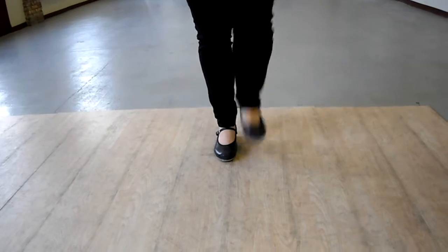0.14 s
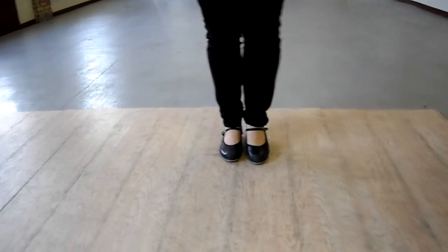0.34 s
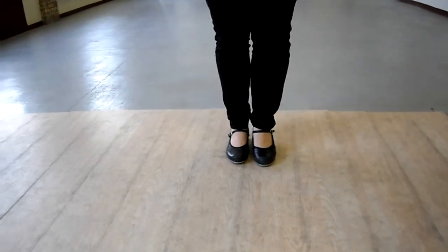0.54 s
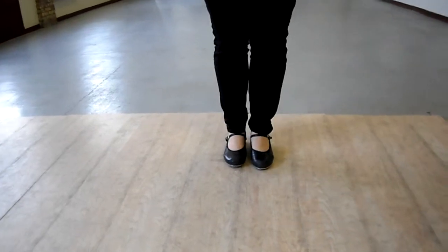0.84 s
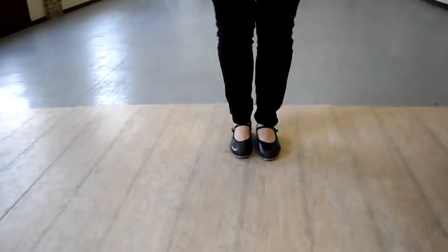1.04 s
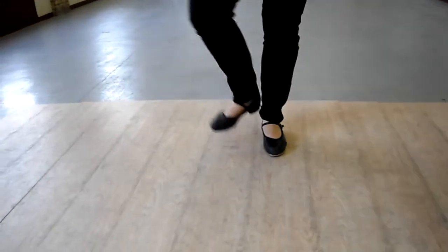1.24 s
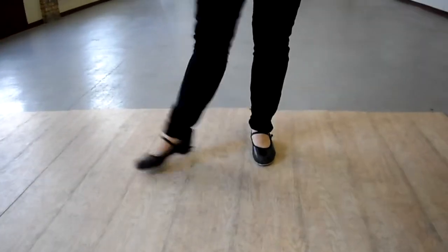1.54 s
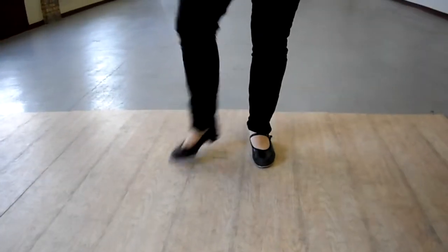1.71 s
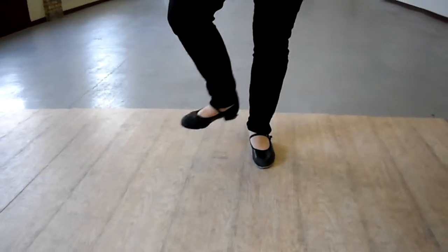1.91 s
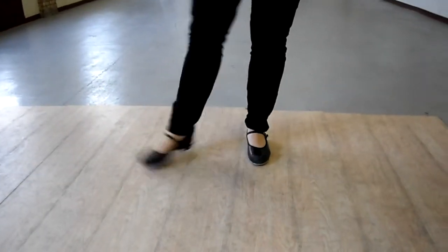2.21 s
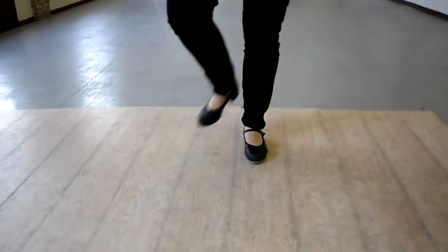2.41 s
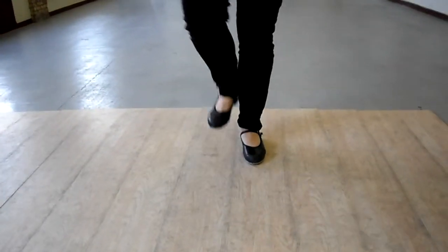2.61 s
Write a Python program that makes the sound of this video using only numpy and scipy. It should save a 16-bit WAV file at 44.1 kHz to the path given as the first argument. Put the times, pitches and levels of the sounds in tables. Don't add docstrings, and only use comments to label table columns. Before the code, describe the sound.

Metal-plated tap shoes click sharply on a wooden board in a large, bare, reverberant room

```python
import sys
import numpy as np
from scipy import signal
from scipy.fft import rfft, irfft, next_fast_len
from scipy.io import wavfile

SR = 44100
rng = np.random.default_rng(int(sys.argv[2]) if len(sys.argv) > 2 else 0)


def invert_db(level):
    return 10 ** (np.asarray(level, dtype=float) / 20)


def inscribe(sig):
    pcm = np.round(np.clip(np.atleast_2d(sig).T, -1, 1) * 32767)
    wavfile.write(sys.argv[1], SR, pcm.astype(np.int16))


N = 121275

LEAD_S = .00026
HALL_TOP_HZ = 14100


def shoes():
    # t/s, peak level/dB, hall level/dB, board ring level/dB
    strikes = [
        (.2070, -6, -32, -29.5),
        (1.4833, -7, -35.5, -26.5),
        (1.6418, -10, -41.5, -40),
        (2.0427, -6.5, -34.5, -24),
        (2.239, -11, -38, -24.5),
    ]
    # t/s, peak level/dB, hall level/dB, left minus right in the shadowed band/dB
    ticks = [
        (.7680, -41.5, -76, -23),
        (1.441, -45.5, -94, -12.5),
    ]
    # f/Hz, level per Hz/dB
    stamp = [(60, -63), (200, -26.5), (420, -18), (1000, -2), (1900, -6), (3500, -17), (8000, -23),
             (14000, -41.5)]
    brush_out = [(60, -72), (200, -34.5), (480, -20), (1100, -7.5), (2500, -13), (5000, -16), (9000, -32),
                 (14000, -42.5)]
    brush_back = [(60, -45.5), (200, -19), (500, -35), (1100, 6.5), (2500, -4.5), (5000, -10), (9000, -15),
                  (14000, -30.5)]
    flap = [(60, -51), (200, -22), (500, -16), (1100, 1.5), (2200, 1), (4200, -5), (8500, -20.5),
            (14000, -30)]
    step = [(60, -40), (200, -19.5), (500, -19.5), (1100, -5), (2300, -6), (4500, -12), (9000, -24.5),
            (14000, -38)]
    tick = [(60, -63), (1500, -43), (2300, 3.5), (3500, 8), (5500, -3), (8000, -21), (12000, -25),
            (15000, -46.5)]
    colours = [stamp, brush_out, brush_back, flap, step]
    # f/Hz, width/Hz, level/dB
    hall_rings = [
        [(1775, 120, 3), (3680, 370, 3), (4670, 570, -3), (5570, 1000, 5), (6980, 480, -5.5)],
        [(2820, 260, -4), (3600, 510, 3.5), (4500, 1400, -3.5), (6050, 700, 1.5), (10700, 1500, 4)],
        [(3550, 640, 6), (4100, 290, -9), (6720, 660, 8), (11100, 330, -20)],
        [(485, 150, 14), (2790, 300, -9.5), (3950, 880, 3), (6740, 550, 6), (11500, 1800, 0.5)],
        [(2390, 370, 3.5), (2880, 310, -2.5), (3790, 600, 5.5), (5540, 470, 3.5)],
    ]
    # f/Hz, width/Hz, level/dB
    facing_rings = [
        [(1380, 850, 1.5), (2010, 690, -4.5), (3030, 880, 9), (3700, 270, -4.5), (5900, 1500, 9.5),
         (8750, 3200, -7), (13500, 830, 7)],
        [(707, 130, 8), (1190, 400, 9), (1770, 1300, -1.5), (2540, 220, 8), (3180, 280, 8.5), (4860, 580, -9.5),
         (6450, 1900, 8), (10500, 2100, 4.5), (14500, 3000, -11)],
        [(1510, 130, -3), (3000, 2800, 7), (5460, 440, -10), (6600, 2400, 13), (9900, 1100, 1),
         (14450, 1300, 14)],
        [(540, 330, 13), (828, 180, 4), (1260, 320, 10), (3270, 2700, 6), (6780, 2100, 16), (8360, 840, 9.5),
         (11300, 2200, 9.5), (14500, 710, 2)],
        [(600, 430, -12), (1724, 610, 2), (2850, 220, 0), (4060, 550, 7), (4900, 890, -2.5), (9800, 450, 5),
         (15500, 1500, -12)],
    ]
    # t after the blow/ms, size over the blow (minus = slaps back on the sole)
    chatters = [
        [(.72, 0.35), (2, 0.028), (2.7, -0.059), (3.75, 0.36), (4.3, -0.12)],
        [(.8, 0.12), (1.6, 0.19), (2.45, 0.3), (4.2, 0.023), (6.8, 0.03)],
        [(.65, -0.52), (1.3, -0.17), (1.9, 0.016), (2.8, .15)],
        [(.95, 0.13), (1.65, 0.24), (2.35, 0.16), (3.15, .2)],
        [(.7, -1.13), (1.7, -0.076), (2.2, 0.48), (4, -0.072)],
    ]
    thump_levels = [-57.5, -62, -63, -71, -56.5]
    # f/Hz, level/dB
    near_pan = [(900, -1), (1700, -3), (2400, -8), (3800, -4), (4800, -5), (7000, -1), (10000, -5),
                (14000, -4)]
    # f/Hz, level per Hz/dB
    earlier = [(60, -25.5), (150, -45), (640, -2), (1100, -1), (2300, -8.5), (4000, -9.5), (8000, -32.5),
               (14000, -65)]
    # f/Hz, width/Hz, level/dB
    earlier_rings = [(1600, 220, 3.5), (2230, 520, 8.3), (3860, 500, 1.3), (6600, 700, 3.1)]

    near = np.zeros((2, N))
    far = hall(earlier, earlier_rings, -46.5, fills=False)
    ring, thump = board_ring(), board_thump()
    blows = zip(strikes, thump_levels, chatters, colours, hall_rings, facing_rings)
    for (s, db, hall_db, ring_db), thump_db, chatter, colour, rings, facing in blows:
        strike(near, far, (s, db, hall_db), chatter, colour, rings, facing)
        add(near, invert_db(ring_db) * ring, s - LEAD_S)
        add(far, invert_db(thump_db) * thump, s)
    for s, db, hall_db, pan_db in ticks:
        strike(near, far, (s, db, hall_db), [(.3, .15)], tick, [], [], pan_db)

    near = filtered(near, lambda hz: ports(hz, along(near_pan, hz), lag_ms=.045))
    far = filtered(far, lambda hz: ports(hz, 0, lag_ms=.025))
    return near + far


def strike(near, far, row, chatter, colour, rings, facing, pan_db=0):
    # delay/ms, level over the hall/dB, left minus right/dB
    echoes = [(11.76, 7.5, 11), (13.47, 20, -2), (19.75, 9, -5.5), (22.88, -10, 11), (26.3, 7, -6.5),
              (35.9, 2, -4), (49.6, -1, 7), (57.5, 11, -2), (59.3, 0.5, -15), (72.2, 16.5, 0.5)]
    shadow_hz, shadow_width_hz = 2970, 1400
    air_db_per_ms = 0.87
    first_walls_ms, first_walls_top_hz = 15, 15600
    scatter_db = 3.5

    s, db, hall_db = row

    def shade(hz):
        dip = np.exp(-((hz - shadow_hz) / shadow_width_hz) ** 2)
        return ports(hz, pan_db * dip, 0)

    direct = filtered(contact(click(colour, facing), chatter), shade)
    add(near, invert_db(db) * direct, s - LEAD_S)
    add(far, hall(colour, rings, hall_db), s - LEAD_S)

    pulse = click(colour, rings)
    for ms, echo_db, echo_pan_db in echoes:
        gains = invert_db(hall_db + echo_db + np.array([[.5], [-.5]]) * echo_pan_db)
        top_hz = first_walls_top_hz if ms < first_walls_ms else HALL_TOP_HZ

        def air(hz):
            absorption = invert_db(-air_db_per_ms * ms * (hz / 10000) ** 2)
            return absorption / (1 + (hz / top_hz) ** 80)

        echo = filtered(contact(pulse, chatter, scatter_db), air)
        add(far, gains * echo, s + ms / 1000 - LEAD_S)


def contact(pulse, chatter, spread_db=0):
    rattle_db, rattle_rise_s, rattle_t60_s, rattle_hz = -15, .001, 0.012, 2600
    alike = .85
    chatter_hz = 5030

    t = np.arange(1024) / SR
    shared = rng.standard_normal(len(t))
    own = rng.standard_normal((2, len(t)))
    own = filtered(own, lambda hz: hz / (hz + rattle_hz / 2))
    noise = alike * shared + np.sqrt(1 - alike ** 2) * own
    swell = (1 - np.exp(-t / rattle_rise_s)) * invert_db(rattle_db + spread_db - 60 * t / rattle_t60_s)
    blows = filtered(swell * noise, lambda hz: 2j * hz * rattle_hz / (rattle_hz + 1j * hz) ** 2)
    for ms, share in chatter:
        blows[:, round(ms * SR / 1000)] += share
    blows = filtered(blows, lambda hz: 1 / (1 + 1j * hz / chatter_hz))
    blows[:, 0] = 1
    return signal.fftconvolve(blows, pulse[None], axes=1)


def click(colour, rings, size=2048):
    # f/Hz, level/dB
    click_colour = [(100, 0), (500, -1), (1300, -3), (3000, 0), (6000, 5), (10000, 12), (14000, 10),
                    (16500, -4)]
    hz = np.fft.rfftfreq(size, 1 / SR)
    magnitude = invert_db(shaped(colour, rings, hz) + along(click_colour, hz))
    cepstrum = irfft(np.log(magnitude + 1e-6))
    cepstrum = np.r_[cepstrum[0], 2 * cepstrum[1:size // 2], np.zeros(size // 2)]
    pulse = irfft(np.exp(rfft(cepstrum)))
    return pulse / abs(pulse).max()


def shaped(colour, rings, hz):
    db = along(colour, hz)
    for centre_hz, width_hz, ring_db in rings:
        db = db + ring_db * np.exp(-((hz - centre_hz) / width_hz) ** 2 * 2)
    return db


def board_ring():
    # f/Hz, level/dB, t60/s
    modes = [(571, -7.5, 0.036), (1150, -6, 0.04), (1507, -5.5, 0.042)]
    bass_limit_hz = 370
    t = np.arange(SR // 5) / SR
    ring = sum(invert_db(db - 60 * t / t60) * np.sin(2 * np.pi * hz * t) for hz, db, t60 in modes)
    return filtered(ring, lambda hz: (1j * hz / (bass_limit_hz + 1j * hz)) ** 3)[None]


def board_thump():
    thump_hz, thump_t60_s = 144, 0.081
    t = np.arange(SR // 5) / SR
    return np.tile(invert_db(-60 * t / thump_t60_s) * np.sin(2 * np.pi * thump_hz * t), (2, 1))


def hall(colour, rings, db, fills=True):
    # f/Hz, t60/s
    decay = [(80, 0.8), (260, 1.8), (700, 1.89), (1800, 2.227), (4800, 1.627), (8000, 1.1), (12800, 0.62)]
    start_ms, fill_ms = 11, 4.4
    hz, t, z = signal.stft(rng.standard_normal((2, N)), SR, nperseg=256)
    z = z * invert_db(-60 * t / along(decay, hz)[:, None])
    pair = signal.istft(z, SR, nperseg=256)[1][:, :N]
    tail = wide(filtered(pair, lambda f: invert_db(shaped(colour, rings, f))))
    tail = tail / tail[:, :SR // 10].std()
    ms = np.arange(N) / SR * 1000
    fill = 1 - np.exp(-np.clip(ms - start_ms, 0, None) / fill_ms) if fills else 1
    return filtered(invert_db(db) * fill * tail, lambda f: 1 / (1 + (f / HALL_TOP_HZ) ** 80))


def wide(pair):
    # f/Hz, side over mid/dB
    side_width = [(60, -15), (150, -15), (380, -22), (950, -13.5), (2380, -7), (5980, 0.5), (15000, 7.5)]
    # f/Hz, left minus right/dB
    field_pan = [(60, -4), (240, 1), (950, -0.5), (3770, -1.5), (15000, 4)]
    mid, side = filtered(pair, lambda hz: invert_db([0 * hz, along(side_width, hz)]))
    left_right = np.array([mid + side, mid - side])
    return filtered(left_right, lambda hz: invert_db(np.outer([.5, -.5], along(field_pan, hz))))


def ports(hz, pan_db, lag_ms):
    turn = 2 * np.pi * np.minimum(hz, 6800) * lag_ms / 1000
    return np.array([invert_db(k * pan_db) * np.exp(-1j * k * turn) for k in (.5, -.5)])


def room_tone():
    # f/Hz, level/dB
    air_colour = [(20, 1.5), (90, -8), (400, -14), (1140, -0.5), (1700, -8), (4400, -32.5), (12300, -37.5),
                  (12700, -54)]
    # f/Hz, rms level/dB
    hum = [(30, -77.5), (90, -83)]
    air_db, hum_side_db = -66, -18
    air = wide(filtered(rng.standard_normal((2, N)), lambda hz: invert_db(along(air_colour, hz))))
    t = np.arange(N) / SR
    drift = np.cumsum(rng.standard_normal((len(hum), 2, N)), axis=2) * .001
    mid, side = sum(invert_db(db) * np.sqrt(2) * np.sin(2 * np.pi * hz * t + phase)
                    for (hz, db), phase in zip(hum, drift))
    return invert_db(air_db) * air / air.std() + mid + invert_db(hum_side_db) * np.outer([1, -1], side)


def along(points, hz):
    f, v = np.transpose(points)
    return np.interp(np.log(hz + 1), np.log(f + 1), v)


def filtered(x, response):
    m = next_fast_len(x.shape[-1] + 8192)
    spectrum = rfft(x, m) * response(np.fft.rfftfreq(m, 1 / SR))
    return irfft(spectrum, m)[..., :x.shape[-1]]


def add(x, part, s):
    room = x[:, round(s * SR):][:, :part.shape[1]]
    room += part[:, :room.shape[1]]


def scene():
    return shoes() + room_tone()


def top_cut(x):
    return signal.sosfilt(signal.butter(12, 16650, fs=SR, output="sos"), x)


def record(dry):
    sweep_ms, sweep_from_hz, top_hz = .5, 10000, 16600

    def band_limit(hz):
        early = np.exp(2j * np.pi * hz ** 3 / sweep_from_hz ** 2 * sweep_ms / 3000)
        return early * (hz < top_hz)

    return top_cut(filtered(dry, band_limit))


dry = scene()
out = record(dry)
inscribe(out)
```